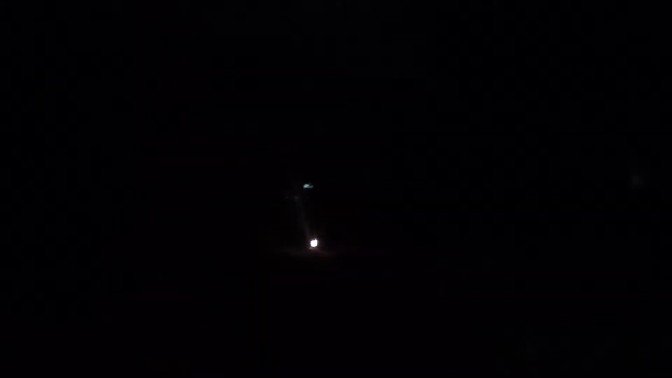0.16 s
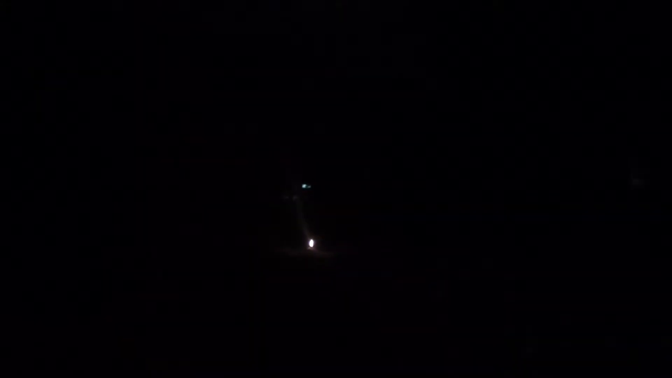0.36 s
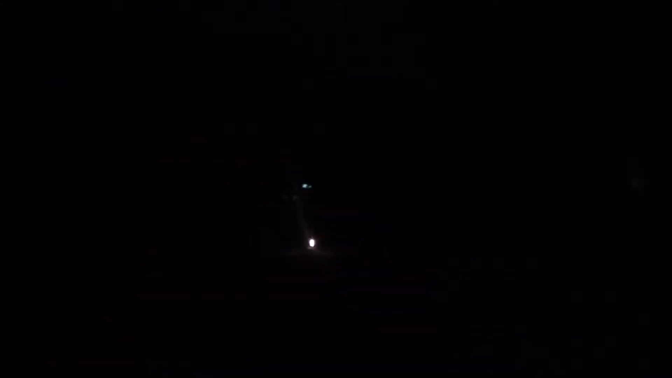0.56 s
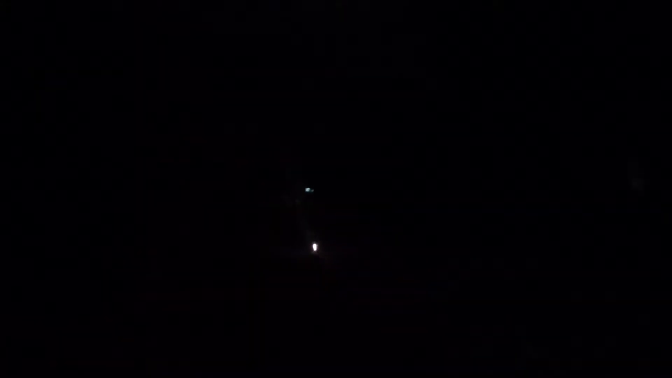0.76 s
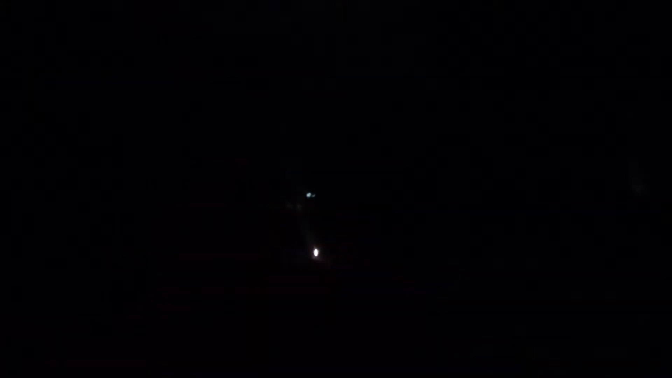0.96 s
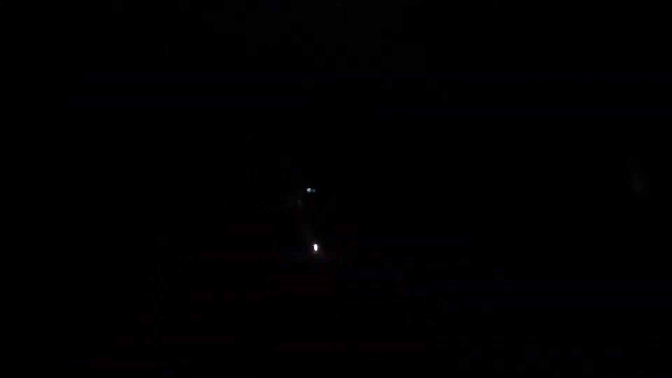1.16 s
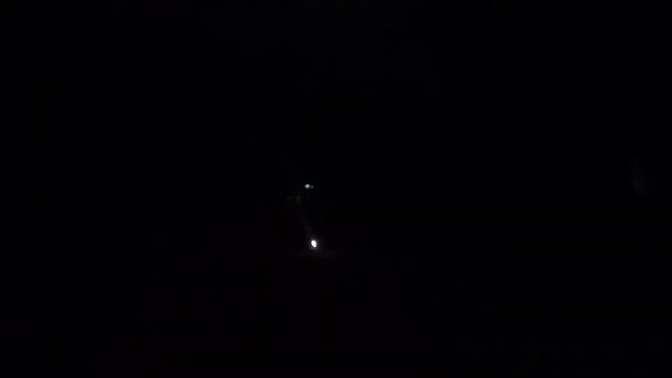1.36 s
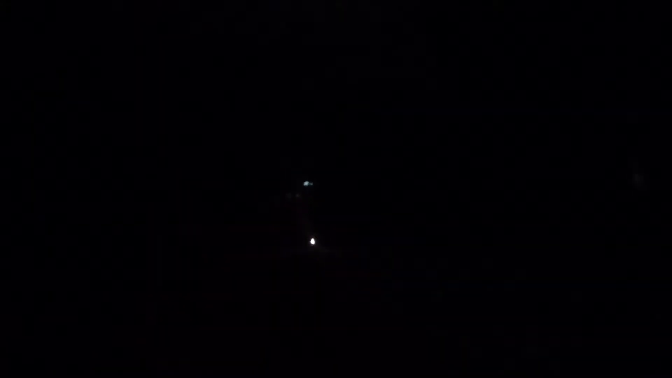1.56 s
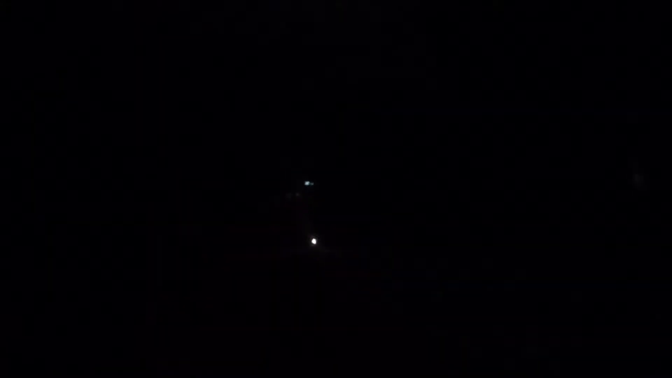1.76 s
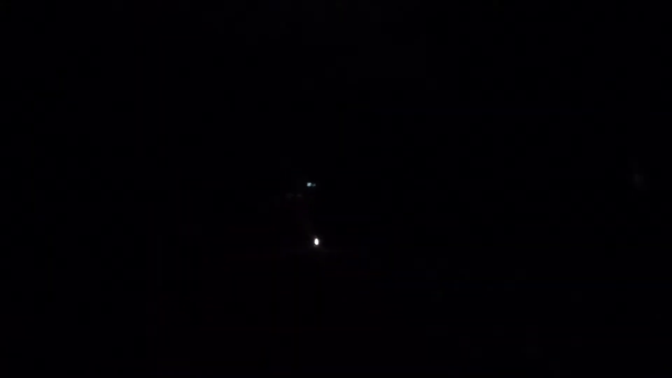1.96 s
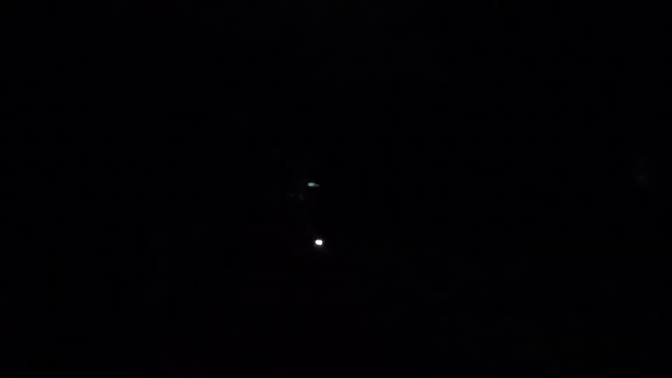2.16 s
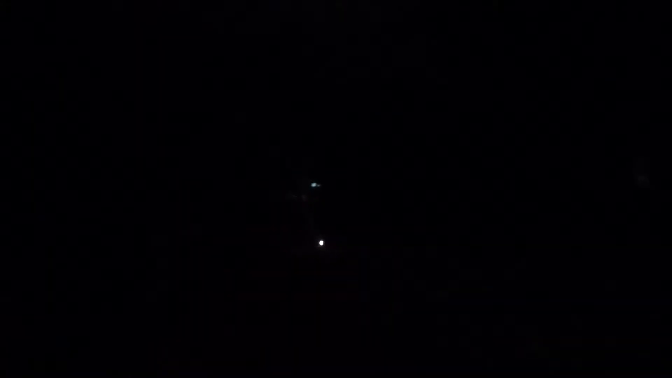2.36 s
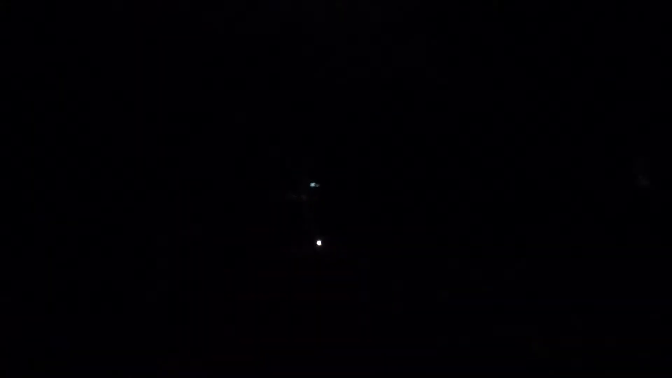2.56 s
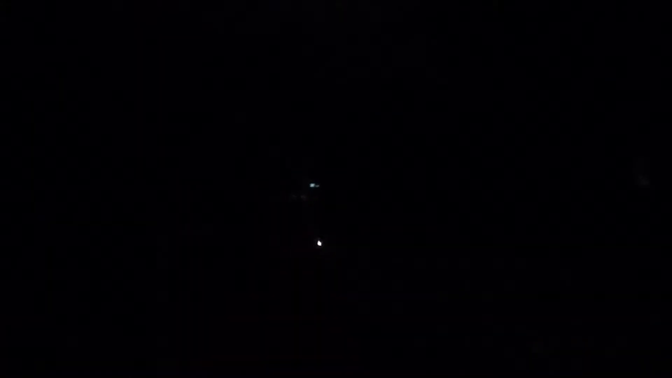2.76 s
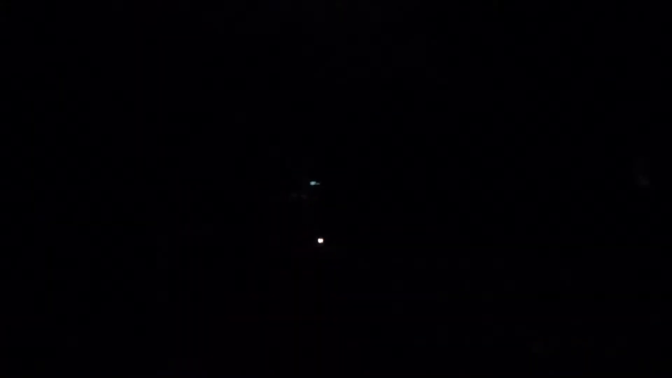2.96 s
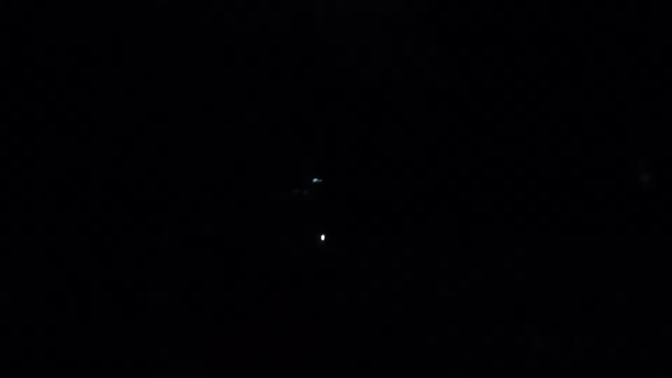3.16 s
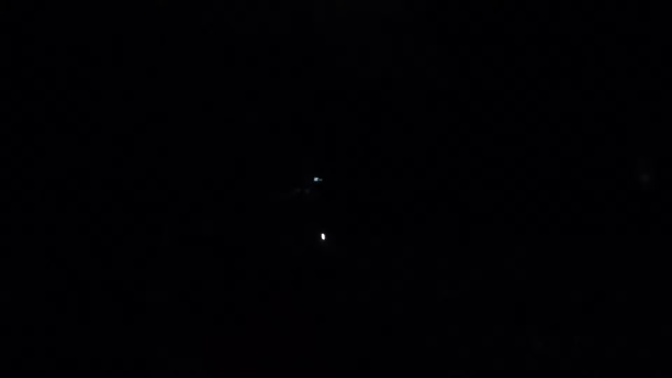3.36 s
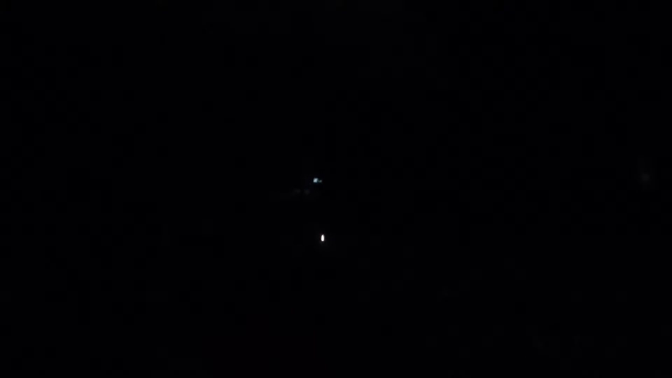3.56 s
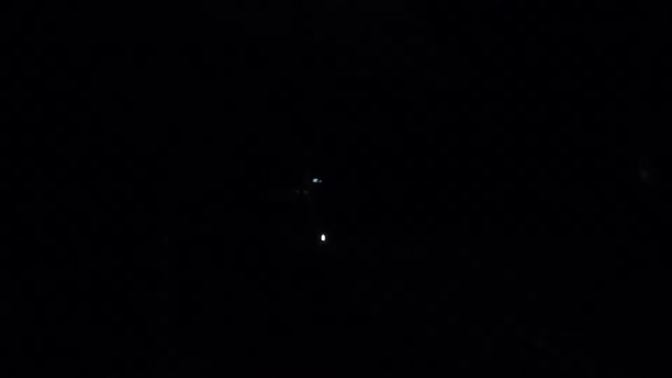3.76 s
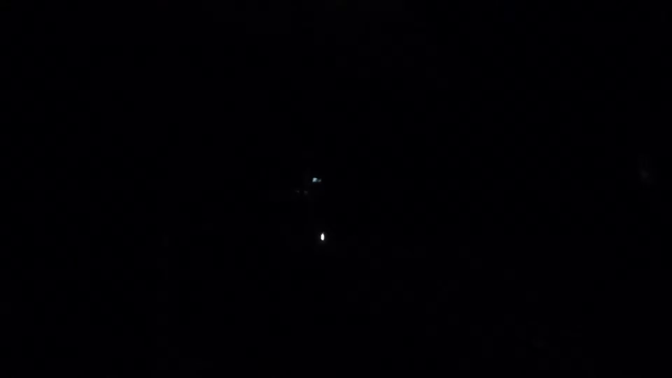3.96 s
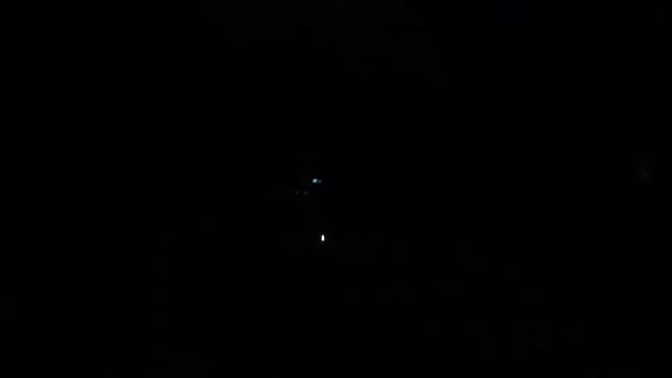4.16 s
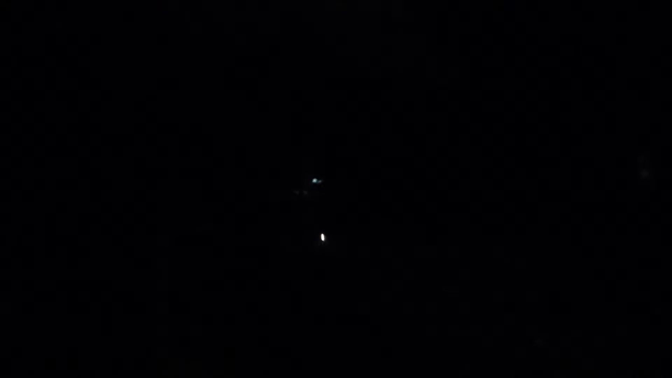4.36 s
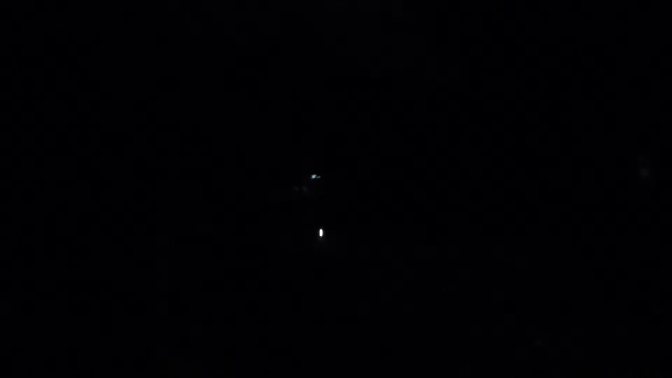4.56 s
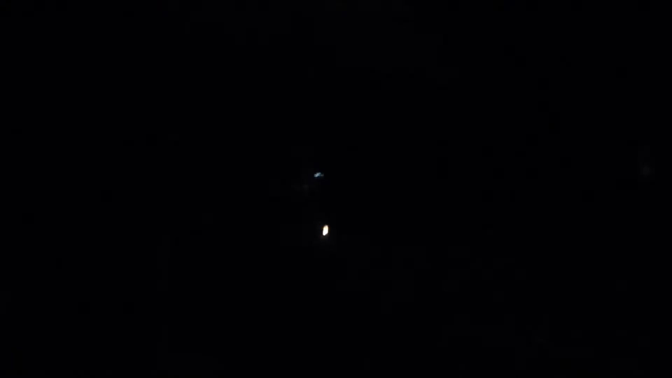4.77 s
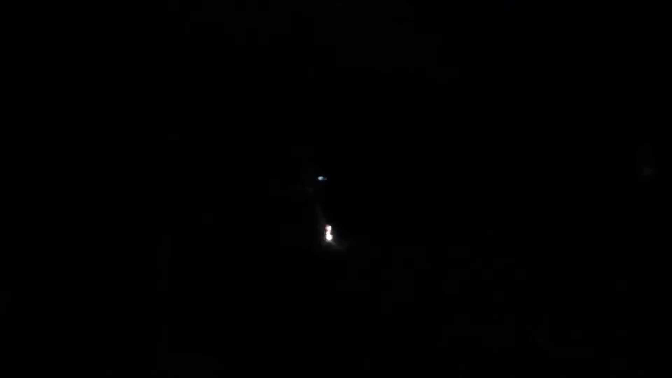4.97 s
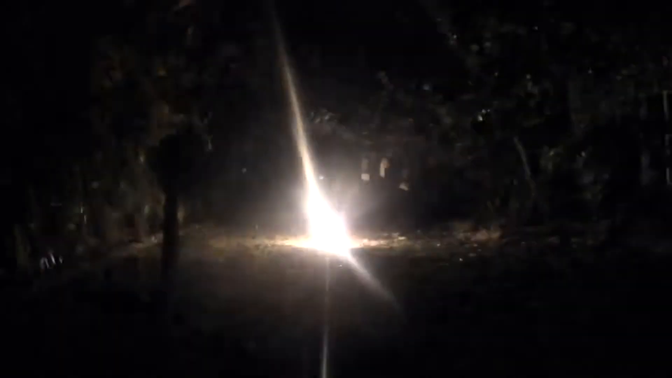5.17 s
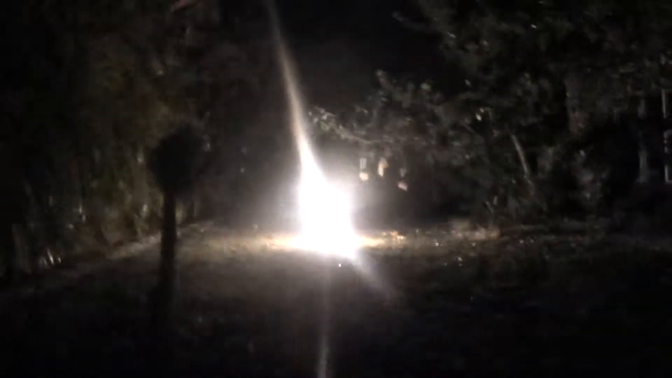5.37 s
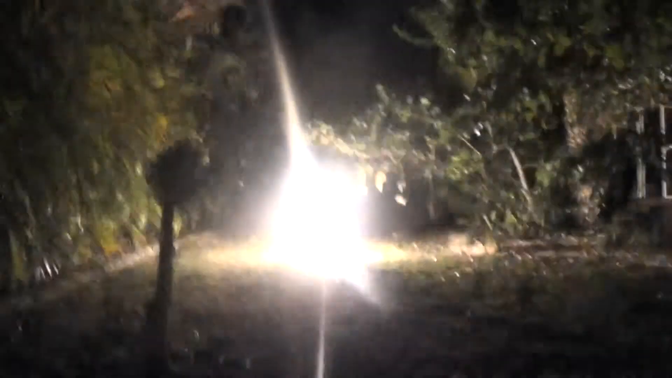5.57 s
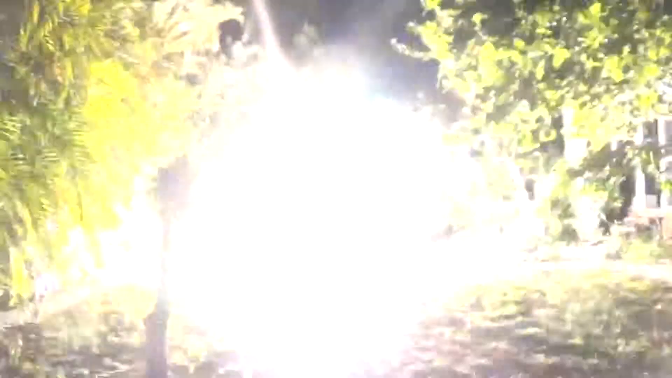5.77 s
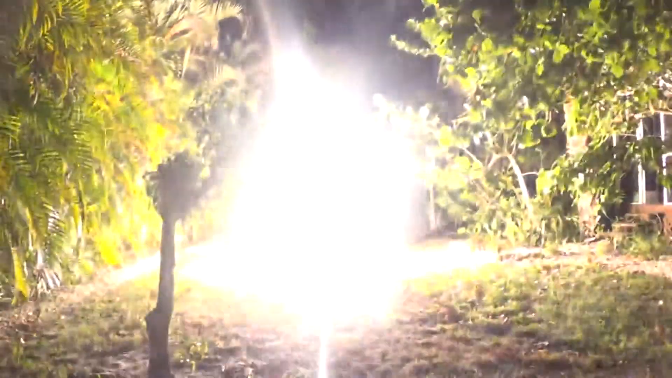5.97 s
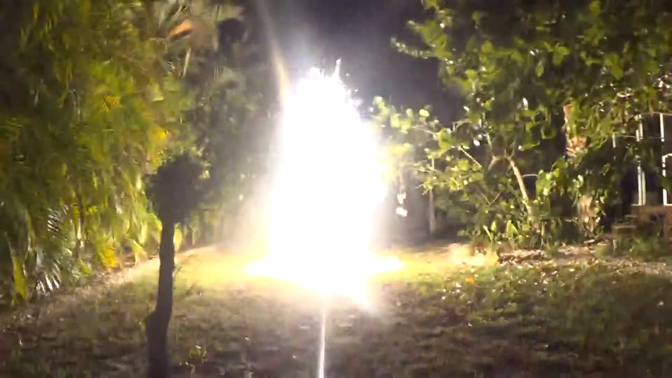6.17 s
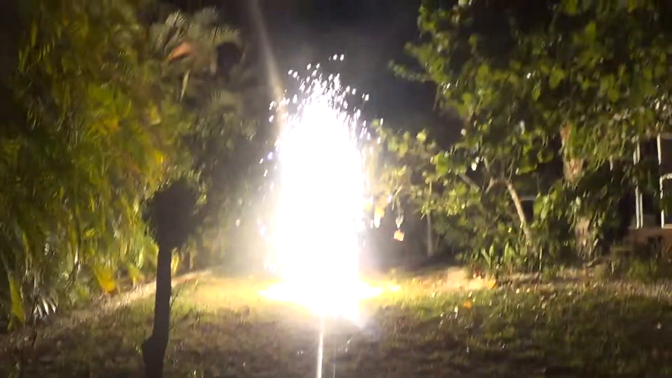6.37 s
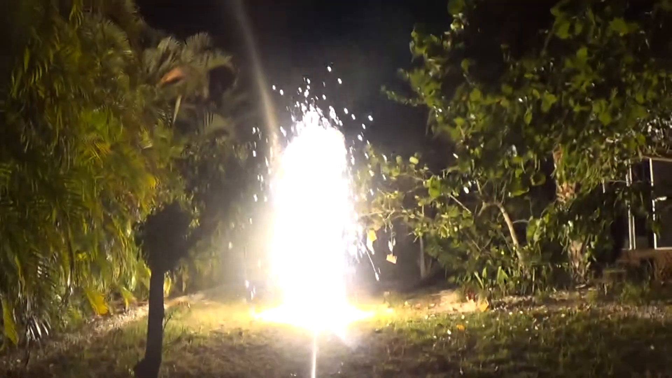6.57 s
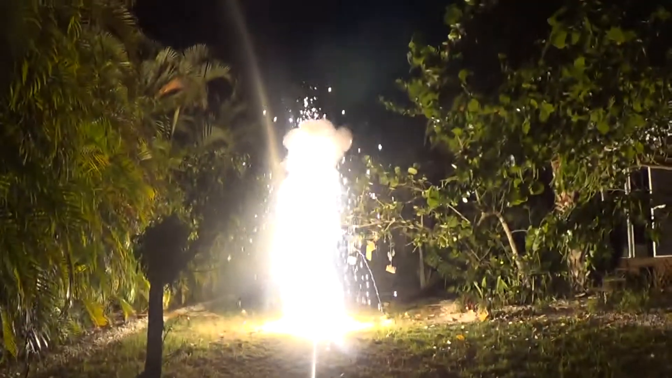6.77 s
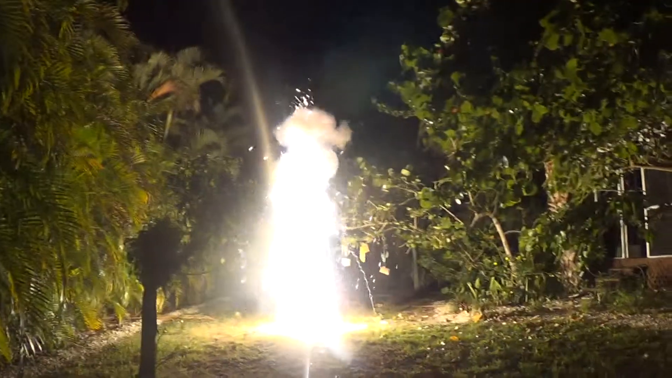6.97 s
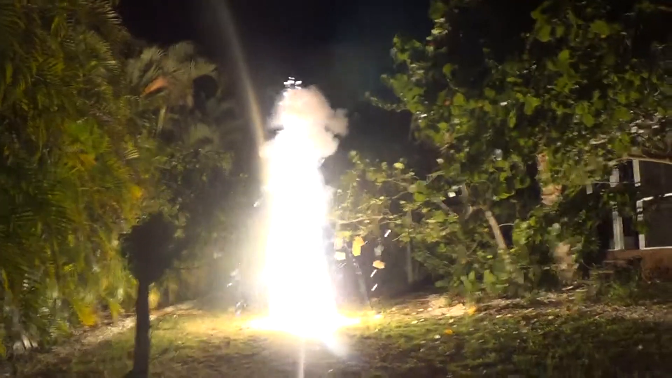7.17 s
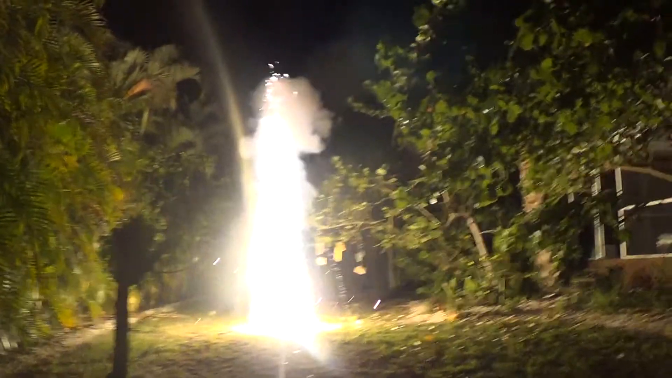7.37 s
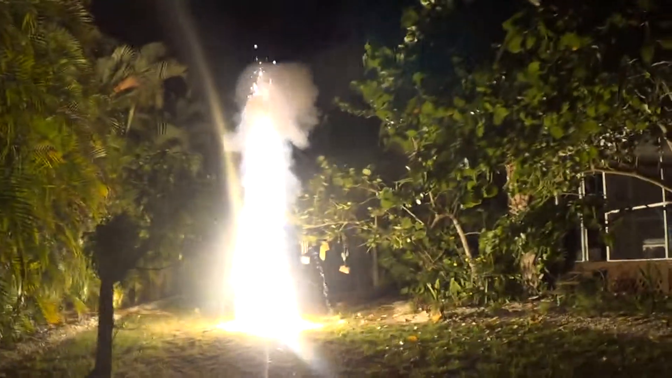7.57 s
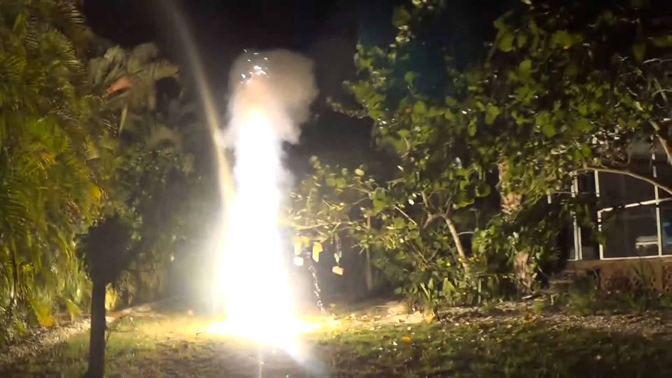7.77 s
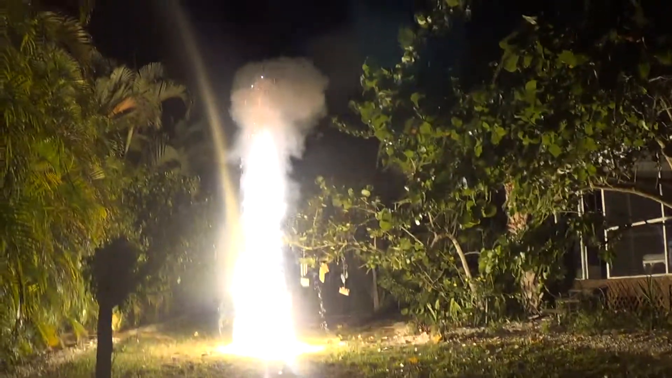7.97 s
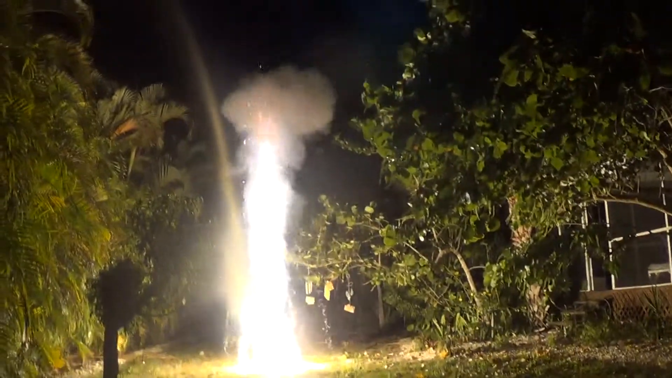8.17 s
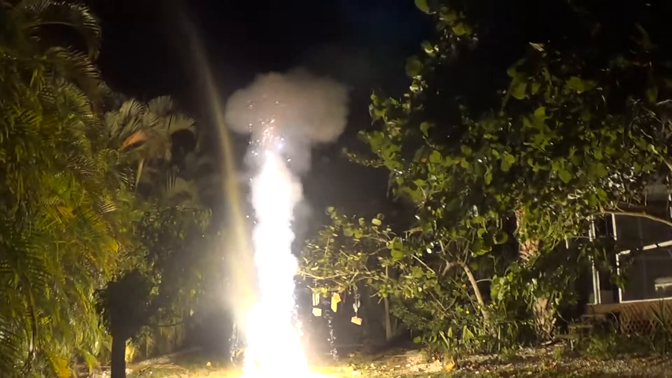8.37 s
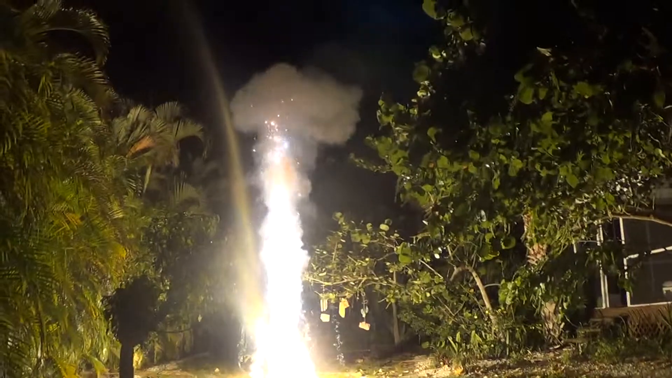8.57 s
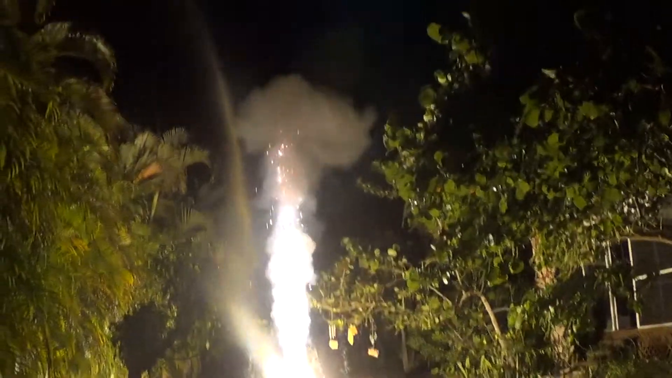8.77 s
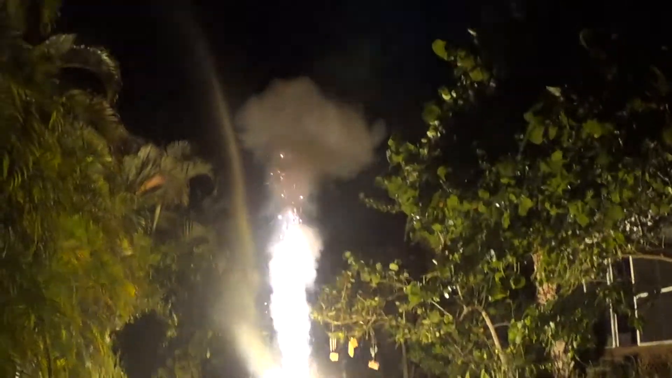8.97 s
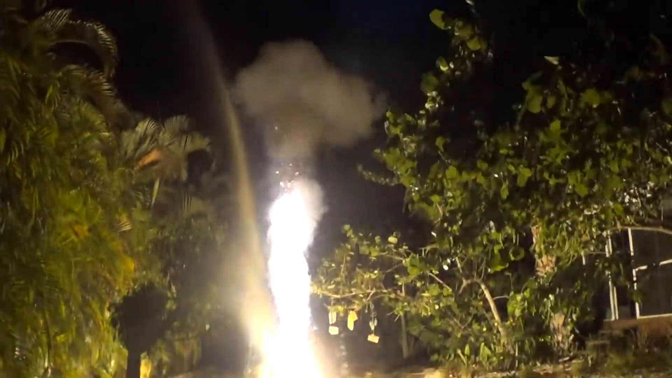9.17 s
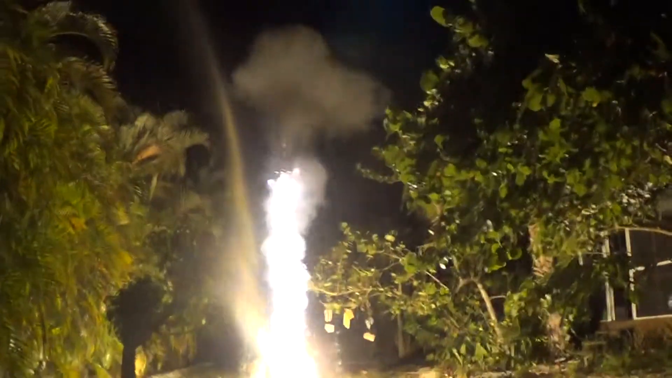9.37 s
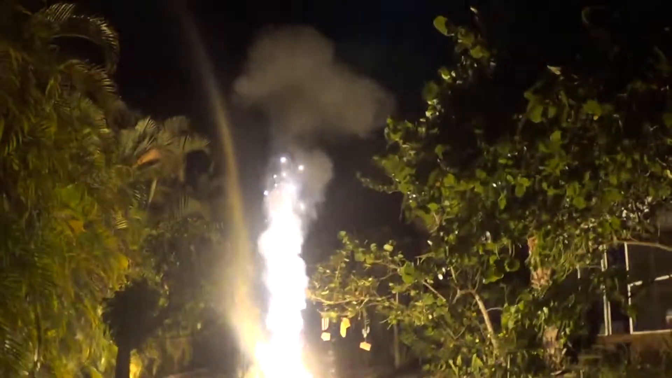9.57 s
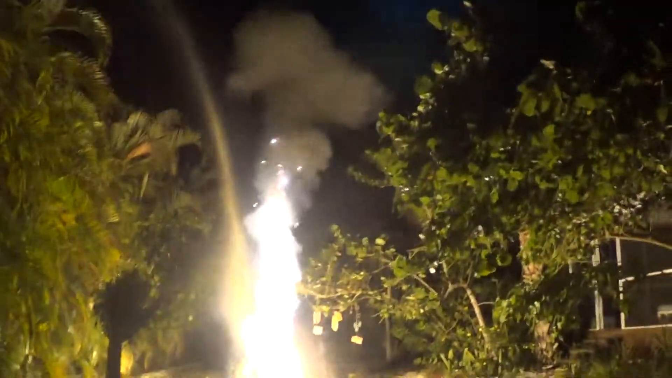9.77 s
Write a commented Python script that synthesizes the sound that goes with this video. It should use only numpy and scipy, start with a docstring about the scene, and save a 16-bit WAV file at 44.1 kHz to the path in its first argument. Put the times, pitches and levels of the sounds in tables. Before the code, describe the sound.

Outdoors in a garden at night, soft air, a faint hum and trilling far crickets lie under short runs of tiny dry ticks and a near cricket's paired chirps. After about five seconds a ground firework catches with a thin hiss, swells and flares into a loud roaring, sizzling jet. Sharp pops and cracks burst irregularly over it, echoing off walls and leaves. Stereo microphone at some distance, limited on the bangs.

```python
"""A fountain firework on a lawn at night, told in order of time. Night air, a faint hum and far crickets lie
underneath; dry ticks ring in short runs, a small flame spits bursts of hiss and a near cricket chirps in pairs
of tones. A primer hisses, then the charge catches: filtered noise roars, rushes and sizzles with the gas flow,
through a resonant tube, and the jet pops twice. After the flare, stars burst as short pulses, come back from
walls and foliage, and drive a limiter."""
import sys
import numpy as np
from scipy import signal
from scipy.fft import rfft, irfft, next_fast_len
from scipy.io import wavfile
from scipy.ndimage import uniform_filter1d, minimum_filter1d

SR = 44100
rng = np.random.default_rng(int(sys.argv[2]) if len(sys.argv) > 2 else 0)


def store_wav(level_fs):
    """Save 16-bit WAV to argv[1]."""
    pcm = np.round(np.clip(np.atleast_2d(level_fs), -1, 1) * 32767)
    wavfile.write(sys.argv[1], SR, pcm.T.astype(np.int16))


N = 433503

# the primer starts, the charge catches, the charge flares [s]
PRIMER_S, CATCH_S, FLARE_S = 4.79, 5.032, 5.86


def from_db(db):
    """Decibels to gain."""
    return 10 ** (np.asarray(db) / 20)


def rms_one(x):
    """Scale to unit rms."""
    return x / np.sqrt(np.mean(x ** 2) + 1e-20)


def in_time(rows):
    """Each column of a time curve, read at every sample."""
    s, *columns = np.transpose(rows)
    return [np.interp(np.arange(N) / SR, s, c) for c in columns]


def at_hz(points, hz):
    """Read a spectrum on a log-frequency axis."""
    known, value = np.transpose(points)
    return np.interp(np.log(np.maximum(hz, 1)), np.log(known), value)


def die_away(t, t60):
    """Exponential decay that falls 60 dB in t60 seconds."""
    return np.exp(-np.log(1000) * t / t60)


def swell_at(s, rise_s, fall_s):
    """Grows to 1 at a given moment, then dies away."""
    t = np.arange(N) / SR - s
    return np.exp(-np.abs(t) / np.where(t < 0, rise_s, fall_s))


def band(x, hz, kind, order=2):
    """Butterworth filter."""
    hz = np.clip(hz, 10, SR / 2 - 500)
    sections = signal.butter(order, hz, kind, fs=SR, output="sos")
    return signal.sosfilt(sections, x + 1e-18)


def drift(rate):
    """Smooth chance with about this many turns a second; spread 1."""
    step = 40   # drawn at every 40th sample
    r = np.exp(-2 * np.pi * rate * step / SR)
    draws = rng.standard_normal(N // step + 2002)
    slow = signal.lfilter([1], [1, -2 * r, r * r], draws)[2000:]   # skip the settling
    return np.interp(np.arange(N) / step, np.arange(len(slow)), rms_one(slow))


def stereo_noise(colour, likeness, size, grain_db=0):
    """Noise of a given colour and graininess whose two sides are partly alike; rms 1."""
    padded = next_fast_len(size)
    hz = np.arange(padded // 2 + 1) * SR / padded
    grains = from_db(grain_db * np.minimum(rng.standard_normal(padded), 3))
    noise = rng.standard_normal((2, padded)) * grains
    mid, side = rfft(noise) * from_db(at_hz(colour, hz))
    alike = np.clip(at_hz(likeness, hz), -1, 1)
    spectra = np.sqrt(1 + alike) * mid + np.sqrt(1 - alike) * side * [[1], [-1]]
    return rms_one(irfft(spectra, padded)[:, :size])


def port_ring(x, hz=9500, width_hz=2600, boost_db=7, top_hz=12500):
    """Sharp fronts set the microphone port ringing: a two-pole resonance, then a softened top."""
    r = np.exp(-np.pi * width_hz / SR)
    edge = (1 - r * r) / 2
    poles = [1, -2 * r * np.cos(2 * np.pi * hz / SR), r * r]
    peak = signal.lfilter([edge, 0, -edge], poles, x + 1e-18)
    return band(x + from_db(boost_db) * peak, top_hz, "low")


# colour of the night air: (frequency [Hz], level [dB per Hz])
NIGHT_COLOUR = [(25, -7), (80, 0.5), (150, -0.5), (240, -1), (330, -8), (700, -6.5), (1500, -8.5),
                (3000, -14.5), (7000, -19), (10000, -23.5), (15500, -26)]
# left-right likeness of the night air: (frequency [Hz], likeness [0-1])
NIGHT_WIDTH = [(60, 0.96), (130, 1), (290, 0.77), (640, 0.27), (1400, 0), (3100, 0), (7000, 0.36),
               (15000, .98)]


def night_air(level_db=-66):
    """A steady bed of coloured noise, its stereo width set by frequency."""
    return from_db(level_db) * stereo_noise(NIGHT_COLOUR, NIGHT_WIDTH, N)


# a faint distant hum: (frequency [Hz], level [dB rms])
HUM_TONES = [(122, -80), (242, -82)]


def hum(waver_hz=2):
    """Two faint, slightly wavering low tones."""
    out = np.zeros(N)
    for hz, db in HUM_TONES:
        phase = 2 * np.pi * np.cumsum(hz + waver_hz * drift(3.15)) / SR
        out += from_db(db) * rms_one(np.sin(phase))
    return out


# far crickets: (pitch [Hz], waver [Hz], level [dB rms], phrases [per s], first phrase [s],
# wing strokes [per s])
FAR_CRICKETS = [(6550, 45, -70.5, 3.08, 0.004, 15), (6070, 11.2, -78, 2.65, 0.23, 6.3),
                (6000, 37, -78, 2.8, 0.23, 19), (6280, 130, -73, 3.1, 0.32, 23)]


def far_crickets(phrase_db, stroke_db=3, count=2):
    """Pairs of distant crickets trill on wavering tones, throbbing in phrases and wing strokes."""
    t, out = np.arange(N) / SR, np.zeros(N)
    for hz, waver_hz, db, phrases, first, strokes in FAR_CRICKETS:
        tone = np.zeros(N)
        for _ in range(count):
            tone += np.sin(2 * np.pi * np.cumsum(hz + waver_hz * drift(30.1)) / SR)
        throb = phrase_db * np.cos(2 * np.pi * phrases * (t - first) + 0.21 * drift(1))
        throb += stroke_db * np.cos(2 * np.pi * strokes * t + drift(4.1))
        out += from_db(db) * rms_one(tone * from_db(throb))
    return out


# single ticks and evenly paced runs, accents alternating in sign:
# (start [s], length [s], relative level [dB], accent of the first tick [dB])
RUNS_OF_TICKS = [(0.035, .192, -42.5, 2.5), (.559, .053, -44.5, 2), (.752, 0, -43, 1), (.859, 0, -47, 1.5),
                 (1.627, .149, -44.5, -2.5), (1.949, 0, -49, -0.5), (2.127, 0, -50, 2),
                 (2.361, .230, -44, -2.5), (3.0498, .269, -42.5, -0.5), (3.694, 0, -41, 3),
                 (3.926, .098, -42, 2.5), (4.164, .198, -44.5, -4.5), (4.605, 0, -42.5, -0.5),
                 (4.683, 0.0044, -49, 2), (4.754, 0, -48, 1), (4.777, .266, -44, -3)]
TICK_GAP_S = .05   # rough pace; each run divides its length evenly
STRAY_TICKS_PER_S, STRAY_TICK_DB = 2, -58   # faint ones at random moments


def tick_times():
    """Every tick of the runs, and faint strays until the charge catches, as (s, dB, accent dB)."""
    rows = []
    for start, length, db, accent_db in RUNS_OF_TICKS:
        times = np.linspace(start, start + length, 1 + round(abs(length) / TICK_GAP_S))
        rows += [(s, db, accent_db * (-1) ** k) for k, s in enumerate(times)]
    strays = CATCH_S * rng.random(int(STRAY_TICKS_PER_S * CATCH_S))
    return rows + [(s, STRAY_TICK_DB, 0) for s in strays]


# what a tick rings with: (frequency [Hz], relative level [dB], t60 [s])
TICK_RING = [(1510, -12.5, 0.029), (2035, -9.5, 0.022), (2630, -8, 0.022), (3480, -11, 0.0056),
             (4020, -13.5, 0.0057), (7900, -19.5, .005)]
TICK_SPREAD_DB = 1.5
TICK_CENTRE_HZ, TICK_OCTAVES_PER_DB = 2150, 0.0645   # accented ticks are brighter


def ticks(level_db=1, tilt_db=7, scatter_db=2, detune=0.05, rasp_db=-8.5, rasp_t60=0.02):
    """Small dry ticks: a short rasp over a few modes, each time a little differently tuned."""
    hz, mode_db, t60 = np.transpose(TICK_RING)
    flip = (-1) ** np.arange(len(hz))   # neighbouring modes start in opposite directions
    t, out = np.arange(1800) / SR, np.zeros(N)
    for s, db, accent_db in tick_times():
        force_db = accent_db + TICK_SPREAD_DB * rng.standard_normal()
        strength, tuning = rng.standard_normal((2, len(hz)))
        # dull ticks favour the low modes
        brightness = np.log2(TICK_CENTRE_HZ / 2400) + TICK_OCTAVES_PER_DB * force_db
        lean = tilt_db * brightness * np.log2(hz / 2700)
        gain = from_db(mode_db + lean + scatter_db * strength) * flip
        tuned_hz = hz * (1 + detune * tuning)
        modes = np.sin(2 * np.pi * np.outer(t, tuned_hz)) * die_away(t[:, None], t60)
        rasp = rms_one(band(rng.standard_normal(len(t)), [1400, 5000], "band", order=3))
        rasp = rasp * die_away(t, rasp_t60)
        at = int(s * SR)
        out[at:at + len(t)] += from_db(level_db + db + force_db) * (modes @ gain + from_db(rasp_db) * rasp)
    return band(out, 1400, "high", order=3)


# short bursts of hiss: the small flame spits, and the last two pop from the jet after it catches: (time [s],
# relative level [dB], t60 [s])
HISS_SPITS = [(.728, -53, .02), (3.6943, -28.5, 0.0088), (3.757, -48, .04), (3.779, -51, .03),
              (4.342, -56, 0.022), (4.375, -54, .02), (5.455, -29, .03), (5.628, -23.5, 0.052)]


def spits(level_db=-6.0):
    """Very short bursts of bright, fast-decaying hiss from the flame, and two pops from the jet."""
    t, out = np.arange(2000) / SR, np.zeros(N)
    for s, db, t60 in HISS_SPITS:
        at = int(s * SR)
        hiss = rng.standard_normal(len(t)) * die_away(t, t60)
        out[at:at + len(t)] += from_db(db + level_db) * hiss
    return port_ring(band(out, [2000, 4000], "band", order=1))


# the near cricket's double chirps: (time [s])
DOUBLE_CHIRPS = [2.099, 2.466, 2.811, 3.157, 3.531, 3.889, 4.288, 4.634, 4.968, 5.402]
CHIRP_HZ, CHIRP_S, CHIRP_GAP_S = 6420, 0.029, .053   # pitch, stroke length, start to start


def near_cricket(level_db=-50.5, echo_db=-10, echo_s=0.021):
    """Two wing strokes a chirp, each a nearly pure tone with an echo behind it."""
    t, strokes = np.arange(N) / SR, np.zeros(N)
    stroke = np.sin(np.linspace(0, np.pi, int(CHIRP_S * SR)))
    for s in DOUBLE_CHIRPS:
        for start in (s, s + CHIRP_GAP_S):
            at = int(start * SR)
            strokes[at:at + len(stroke)] += from_db(level_db) * stroke
    song = strokes * np.sin(2 * np.pi * np.cumsum(CHIRP_HZ + 12 * drift(24.0)) / SR)
    return song + from_db(echo_db) * np.interp(t - echo_s, t, song)


# the cardboard tube deepens as it burns empty: (time [s], resonance [Hz], resonance level [dB])
TUBE_RING = [(5.0, 2430, 0), (6.2, 2280, -15), (7.0, 1850, -21), (7.8, 1460, -4), (8.6, 1420, -3.5),
             (9.2, 1400, 0), (9.83, 1370, -14)]


def tube(x, width_hz=320, overtone=3.42, overtone_db=-9):
    """The air in the tube rings at a sinking pitch, with one overtone."""
    hz, db = in_time(TUBE_RING)
    r, out = np.exp(-np.pi * width_hz / SR), x
    for multiple, mode_db in [(1, 0), (overtone, overtone_db)]:
        # shift the resonance down to 0 Hz, smooth there, shift back
        turn = np.exp(2j * np.pi * multiple * np.cumsum(hz) / SR)
        ring = turn * signal.lfilter([1 - r], [1, -r], x * turn.conj())
        out = out + 2 * from_db(db + mode_db) * np.real(ring)
    return out


# hard echoes: (delay [s], level [dB], dull above [Hz], right ear later by [ms])
WALL_ECHOES = [(.0025, -52, 1960, 0), (0.0169, -7, 1530, .05), (0.0394, -7.5, 1960, -.05),
               (.0740, -24, 1500, 0)]


def wall_echoes(x):
    """A few dull, separate reflections, some reaching the two ears at slightly different times."""
    out = np.zeros((2, N))
    for delay, db, dull_hz, later_ms in WALL_ECHOES:
        echo = from_db(db) * band(x, dull_hz, "low", order=1)
        for side, lag in enumerate([delay, delay + later_ms / 1000]):
            n = max(1, int(lag * SR))
            out[side, n:] += echo[side, :-n]
    return out


def sparks(per_s, spread_db):
    """Metal grains flash at random, a few much louder than the rest."""
    born = rng.random(N) < per_s * from_db(3 * drift(8)) / SR
    sizes = from_db(spread_db * np.minimum(rng.exponential(1, N), 6))
    return rms_one(port_ring(band(born * sizes, 2470, "high")))


# jet colour: (frequency [Hz], level [dB per Hz])
GAS_COLOUR = [(35, -21), (80, -3.5), (130, -2), (185, 1), (310, -3), (450, -1.5), (650, -4), (1100, -9),
              (1900, -1.5), (3100, -8.5), (6500, -2.5), (10000, 6), (12500, -4), (16000, -19)]
# left-right likeness of the jet: (frequency [Hz], likeness [0-1])
GAS_WIDTH = [(40, 1), (130, 1), (290, 1), (640, 0.98), (1400, 0.87), (3100, 0.82), (7000, 1), (15000, 1)]
# gas flow as the charge catches, opens up and burns on: (time [s], level [dB re full flow])
GAS_FLOW = [(5.04, -21.5), (5.16, -16), (5.23, -13.5), (5.55, -11), (5.78, -4.5), (5.87, 0), (6.3, -0.5),
            (6.68, 0.5), (6.9, 0.5), (7.2, -0.96), (7.85, 1.5), (8.4, -.5), (8.95, -1.35), (9.3, -2),
            (9.83, -0.5)]
# the finest hiss brightens around the flare and then dulls: (time [s], level added to the top [dB])
TOP_SHEEN = [(5.0, -1), (6.0, 3), (6.8, -8.5), (7.8, -8), (9.83, -18)]
# each voice of the jet: base level at full flow [dB], and its dB per dB of flow
ROAR_DB, ROAR_FOLLOWS = -42, 1.63
RUSH_DB, RUSH_FOLLOWS = -39, 1
SIZZLE_DB, SIZZLE_FOLLOWS = -34.5, 0.67
ROAR_TOP_HZ = 1390   # the roar gives way to the rush here
PRIMER_DB = -15   # the primer hisses faintly until the charge catches
# the charge flares once: a short low puff and a longer flash of sizzle
PUFF_DB, PUFF_RISE_S, PUFF_FALL_S = 8, 0.059, 0.011
FLASH_DB, FLASH_RISE_S, FLASH_FALL_S = 5, 0.028, 0.17
SIZZLE_FADE_DB_PER_S = 0.78   # after the flare
COLD_DB, WARM_UP_S = -6.5, 0.21   # the metal sizzles less until it is hot
# the narrow nozzle adds a thin hiss until it burns wide after the flare
NOZZLE_DB, NOZZLE_FOLLOWS, NOZZLE_FADE_DB_PER_S = -48, 0.91, 21
NOZZLE_LOW_HZ, NOZZLE_HIGH_HZ = 2760, 4900


def jet(spark_db=-5, spark_spread_db=4):
    """Turbulent gas: a lumpy roar, a rush above it, and a sizzle of burning metal, driven by the flow."""
    t, (flow,) = np.arange(N) / SR, in_time(GAS_FLOW)
    since_flare = np.maximum(t - FLARE_S, 0)
    # voice levels in dB
    roar = ROAR_DB + ROAR_FOLLOWS * flow + PUFF_DB * swell_at(FLARE_S, PUFF_RISE_S, PUFF_FALL_S)
    rush = RUSH_DB + RUSH_FOLLOWS * flow
    sizzle = SIZZLE_DB + SIZZLE_FOLLOWS * flow
    sizzle += FLASH_DB * swell_at(FLARE_S, FLASH_RISE_S, FLASH_FALL_S)
    sizzle += COLD_DB * np.clip(1 - (t - CATCH_S) / WARM_UP_S, 0, 1)
    sizzle -= SIZZLE_FADE_DB_PER_S * since_flare
    nozzle = NOZZLE_DB + NOZZLE_FOLLOWS * flow - NOZZLE_FADE_DB_PER_S * since_flare

    gas = stereo_noise(GAS_COLOUR, GAS_WIDTH, N)
    gas = tube(gas + wall_echoes(gas))
    # the uneven burn shakes the gas voices together; eddies and flashes add their own flutter (dB)
    sputter, eddies, flashes = .7 * drift(20), 1.3 * drift(30), 1.1 * drift(120)
    low = rms_one(band(gas, ROAR_TOP_HZ, "low", order=3))
    middle = rms_one(band(gas, [ROAR_TOP_HZ, 6000], "band", order=3))
    high = rms_one(band(gas, 5450, "high", order=3))
    thin = rms_one(band(gas, [NOZZLE_LOW_HZ, NOZZLE_HIGH_HZ], "band"))
    out = low * from_db(roar + sputter + eddies)
    out += middle * from_db(rush + sputter)
    out += high * from_db(sizzle + sputter + flashes)
    out += thin * from_db(nozzle + sputter)
    out += sparks(per_s=2000, spread_db=spark_spread_db) * from_db(spark_db + sizzle)

    top = band(out, 9800, "high", order=1)   # a shelf on the finest hiss
    shelf_gain = from_db(in_time(TOP_SHEEN)[0]) - 1
    primer = from_db(PRIMER_DB) * (t > PRIMER_S)
    alight = uniform_filter1d(np.where(t < CATCH_S, primer, 1), size=900)
    return (out + shelf_gain * top) * alight


# small stars crackle at random once the charge has flared; the range reaches down from the level
CRACKLES_PER_S, CRACKLE_DB, CRACKLE_RANGE_DB = 8.3, -12, 4
CRACKLE_MS, CRACKLE_FRONT_HZ = 0.016, 15000


def crackles():
    """Small stars at random moments and strengths, as rows like those of the loud stars."""
    burn_s = N / SR - FLARE_S
    rows = []
    for when, weak in rng.random((int(CRACKLES_PER_S * burn_s), 2)):
        db = CRACKLE_DB - CRACKLE_RANGE_DB * weak
        rows.append((FLARE_S + when * burn_s, db, CRACKLE_MS, CRACKLE_FRONT_HZ))
    return rows


def stars(rows, low_cut_hz=115):
    """Each star frees a puff of gas; the blast is the slope of that outflow, deeper the longer it lasts."""
    out, t_ms = np.zeros(N), np.arange(400) * 1000 / SR
    for s, db, length_ms, front_hz in rows:
        blast = np.diff(t_ms * np.exp(-t_ms / length_ms))
        front = band(blast / blast.max(), front_hz, "low")
        at = int(s * SR)
        out[at:at + len(blast)] += from_db(db) * front[:N - at]
    return port_ring(tube(band(out, low_cut_hz, "high")))


# sound thrown back by foliage: (frequency [Hz], level [dB])
FOLIAGE_COLOUR = [(60, 9), (160, 9), (300, 1), (450, -5.5), (750, 2), (1050, -2.5), (1400, -0.5),
                  (1900, -1.5), (2600, -1.5), (4000, -2.5), (6000, -2.5), (10000, -7), (15000, -7.5)]
# left-right likeness of the foliage: (frequency [Hz], likeness [0-1])
FOLIAGE_WIDTH = [(130, 0.93), (290, 0.9), (640, 0.74), (1400, 0.71), (3100, 0.6), (7000, 0.85), (15000, 1)]
LEAF_DB, LEAF_T60_S, LEAF_RISE_S = -4, 0.46, 0.0043


def foliage(x, grain_db=4, clump_db=1.0):
    """Countless leaves scatter each bang into a coarse rush that swells and dies away."""
    t = np.arange(int(SR * .7)) / SR
    swell = (1 - np.exp(-t / LEAF_RISE_S)) * die_away(t, LEAF_T60_S)
    swell = swell * from_db(clump_db * drift(65)[:len(t)])
    leaves = stereo_noise(FOLIAGE_COLOUR, FOLIAGE_WIDTH, len(t), grain_db)
    response = leaves * swell / np.sqrt(np.sum(swell ** 2))
    return from_db(LEAF_DB) * signal.oaconvolve(x, response, axes=1)[:, :N]


# the loudest bursting stars, levels before filtering and limiting:
# (time [s], level [dB], blast length [ms], front dull above [Hz])
LOUD_STARS = [(6.0017, 14, .069, 15000), (6.2896, -4.5, 0.034, 15000), (6.4580, 14.5, 0.13, 15000),
              (6.8658, -9, .025, 15000), (6.9382, -10, .02, 15000), (7.0148, 7.5, .18, 14000),
              (7.3114, -9, 0.016, 15000), (7.4640, -3.5, 0.047, 15000), (7.473, 2.5, 0.073, 12000),
              (7.5050, -3.5, 0.02, 15000), (7.6233, -10.5, 0.038, 15000), (7.7395, 9.5, 0.06, 8000),
              (7.7788, 7.5, 0.11, 13000), (7.8976, 0, .029, 15000), (8.0223, 4, 0.082, 10000),
              (8.2491, -2.5, .057, 12000), (8.5831, -13, 0.087, 12000), (8.6579, -9.5, 0.063, 14000),
              (8.7352, -11, .021, 14000), (8.8288, -5, 0.038, 13000), (8.8415, -5, 0.11, 13000),
              (8.9861, -9, .056, 13000), (9.0211, 8.5, .065, 7600), (9.1318, -8, 0.16, 9000),
              (9.173, -9, 0.012, 14900), (9.2518, -7.5, 0.0083, 15000), (9.2726, 5, 0.12, 10000),
              (9.304, -1, 0.01, 15000), (9.3468, 4, 0.037, 15000), (9.4159, -1.5, .026, 15000),
              (9.5549, -4.5, 0.089, 12860), (9.7700, -3, 0.02, 14000), (9.778, 11.5, 0.12, 4300)]


def bangs(count=3):
    """Stars burst at different spots, and each spot has its own scatter from the leaves."""
    bursts = LOUD_STARS + crackles()
    spots = [np.tile(stars(bursts[k::count]), (2, 1)) for k in range(count)]
    direct = sum(spots)
    return direct + wall_echoes(direct) + sum(foliage(spot) for spot in spots)


def scene():
    """The firework in its garden, over the night sounds."""
    night = night_air() + hum() + far_crickets(phrase_db=6)
    firework = (jet() + bangs()) * from_db([[.2], [-.2]])   # a touch to the left
    return night + ticks() + spits() + near_cricket() + firework


def record(dry, ceiling=0.72, cutoff_hz=16000):
    """A fast limiter turns each blast down towards the ceiling; then the top is cut steeply."""
    allowed = np.minimum(1, ceiling / (np.abs(dry).max(axis=0) + 1e-9))
    gain = uniform_filter1d(minimum_filter1d(allowed, size=15), size=15)
    top_cut = signal.ellip(10, .2, 80, cutoff_hz, fs=SR, output="sos")
    return signal.sosfilt(top_cut, dry * gain)


dry = scene()
out = record(dry)
store_wav(out)
```